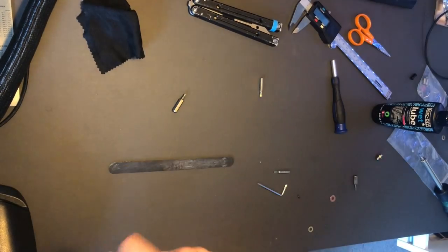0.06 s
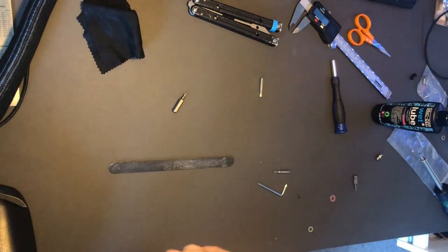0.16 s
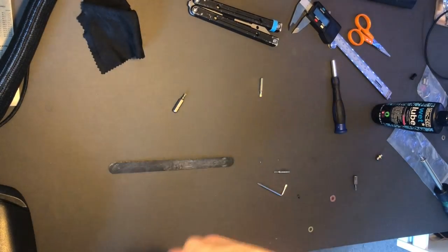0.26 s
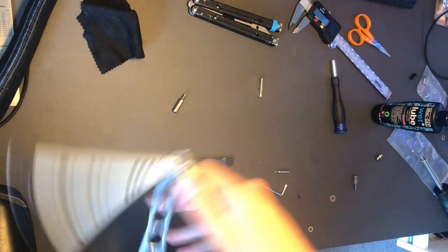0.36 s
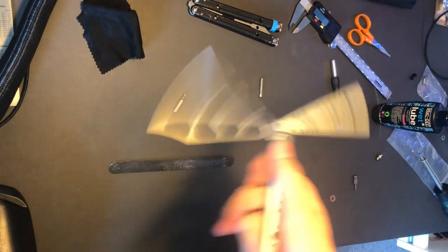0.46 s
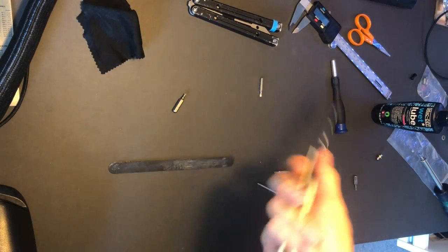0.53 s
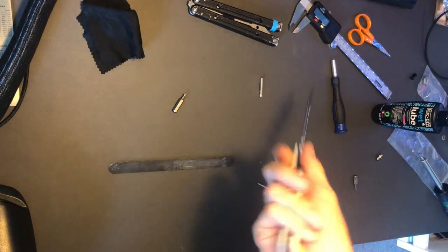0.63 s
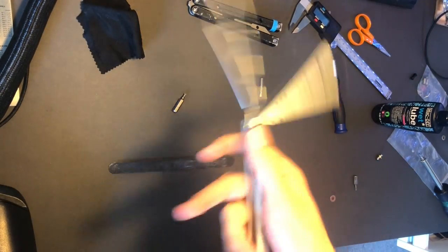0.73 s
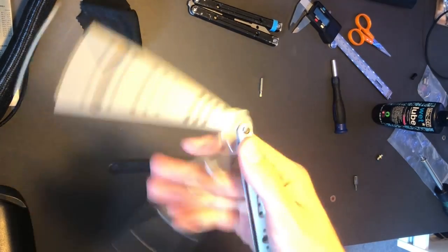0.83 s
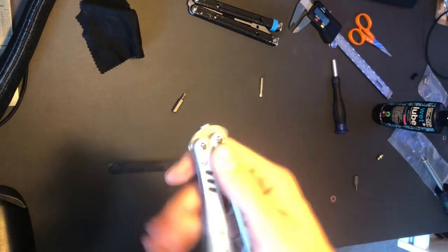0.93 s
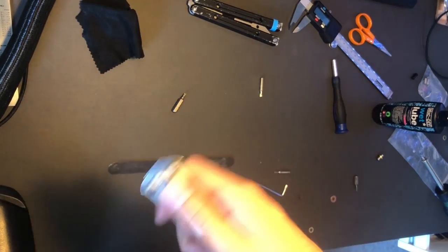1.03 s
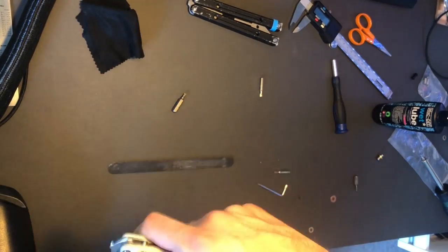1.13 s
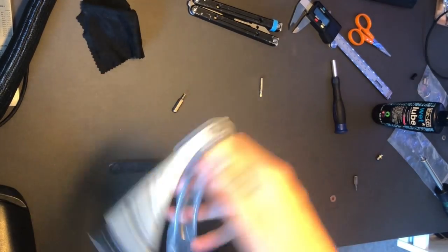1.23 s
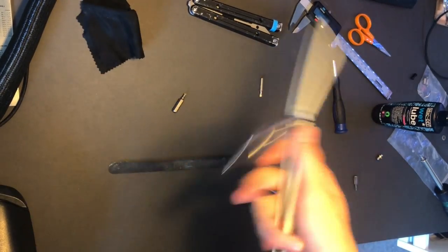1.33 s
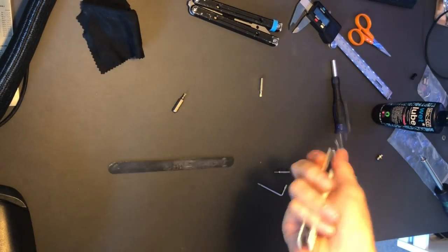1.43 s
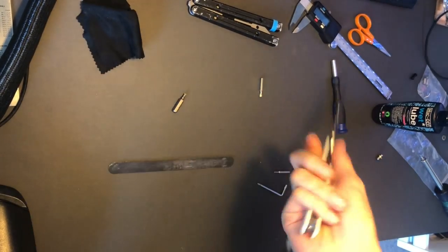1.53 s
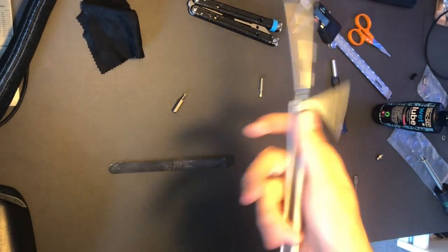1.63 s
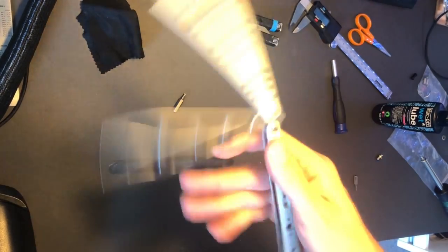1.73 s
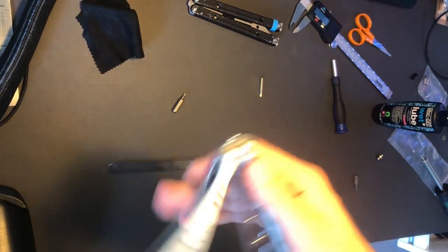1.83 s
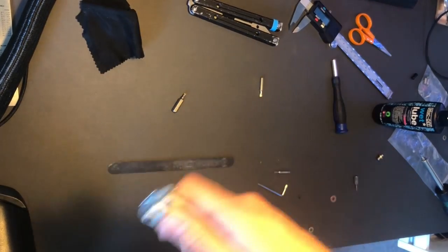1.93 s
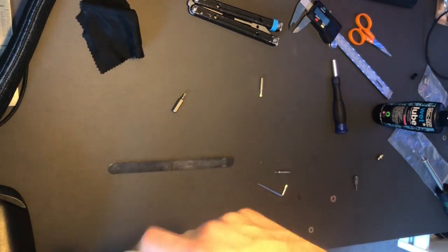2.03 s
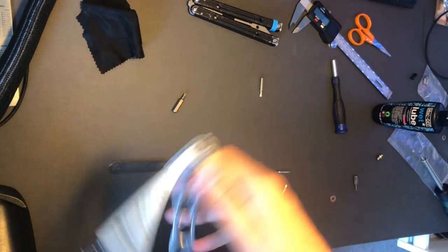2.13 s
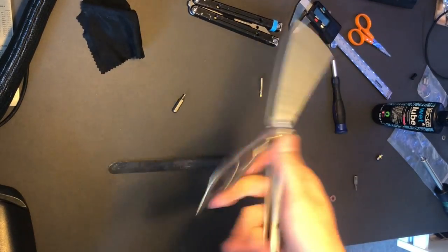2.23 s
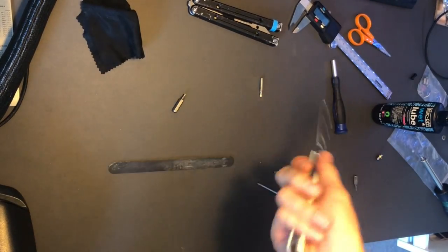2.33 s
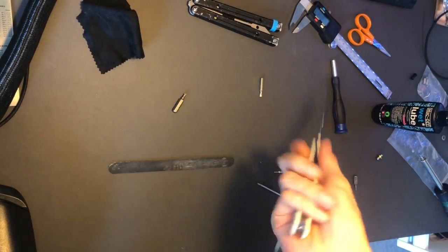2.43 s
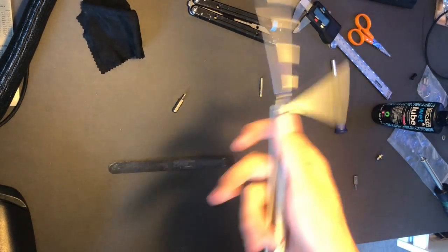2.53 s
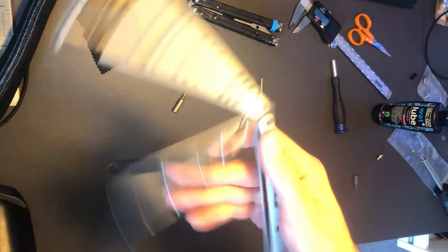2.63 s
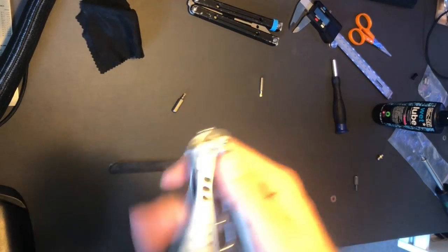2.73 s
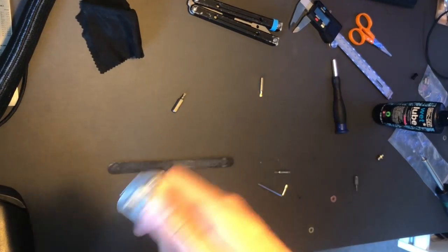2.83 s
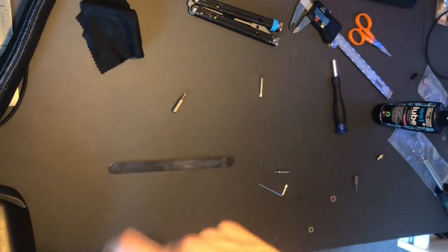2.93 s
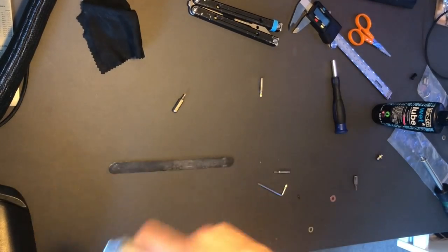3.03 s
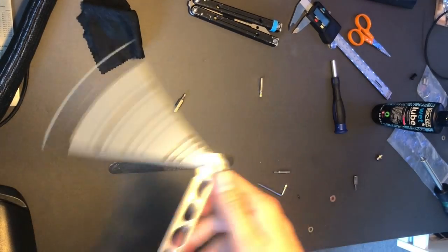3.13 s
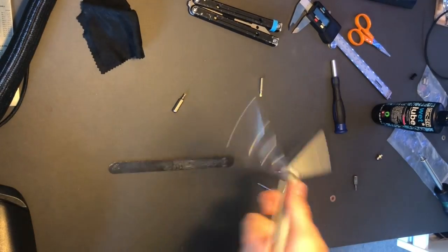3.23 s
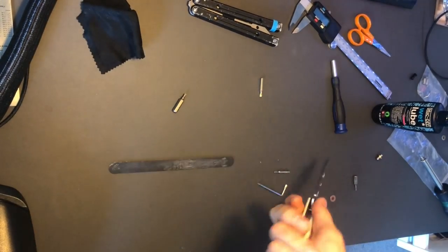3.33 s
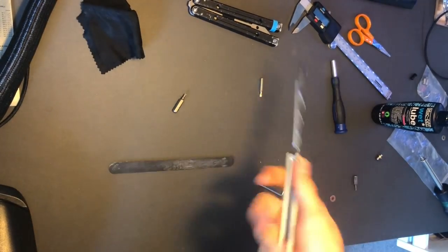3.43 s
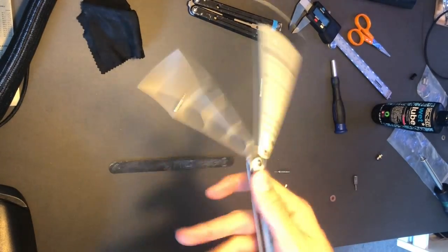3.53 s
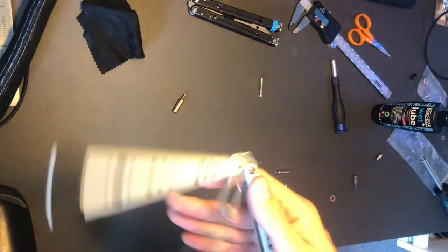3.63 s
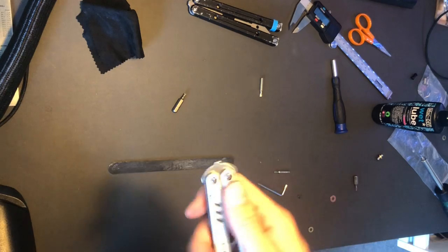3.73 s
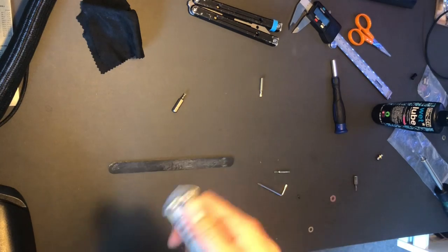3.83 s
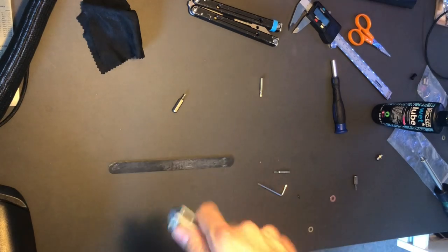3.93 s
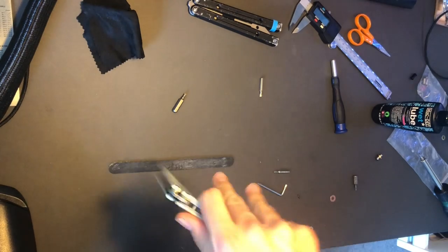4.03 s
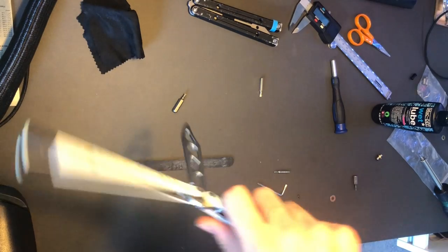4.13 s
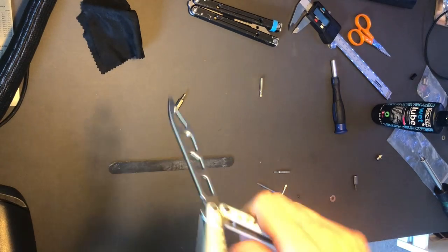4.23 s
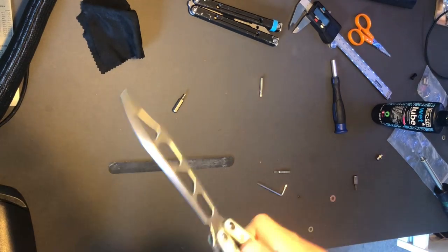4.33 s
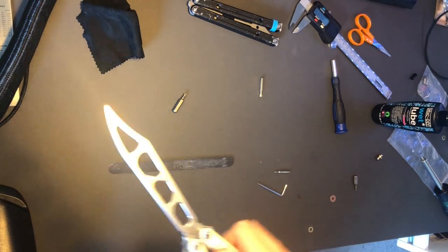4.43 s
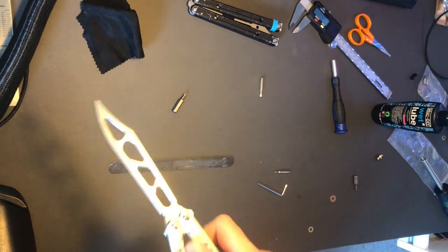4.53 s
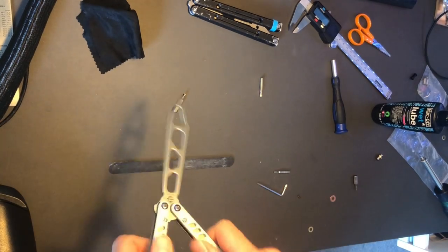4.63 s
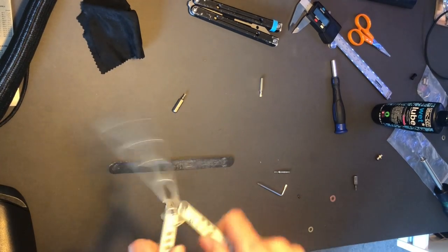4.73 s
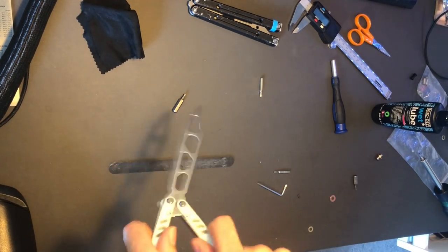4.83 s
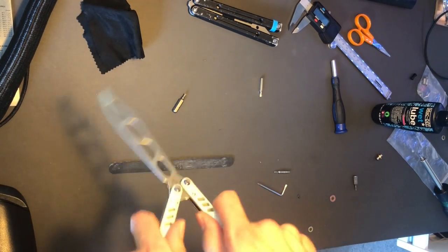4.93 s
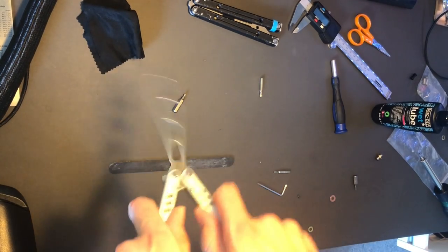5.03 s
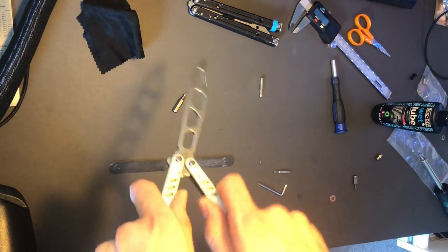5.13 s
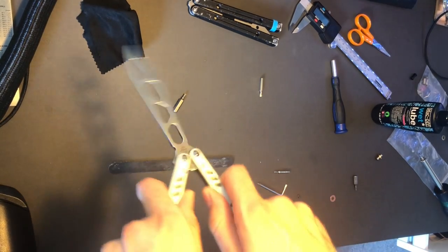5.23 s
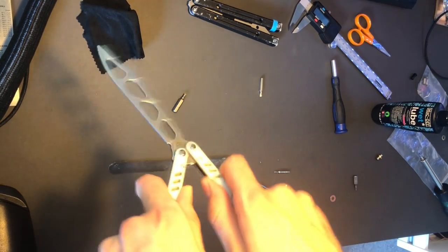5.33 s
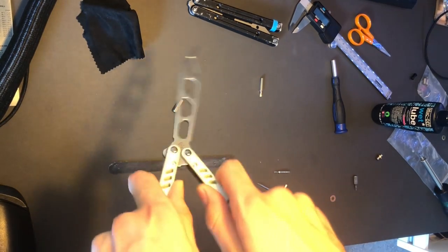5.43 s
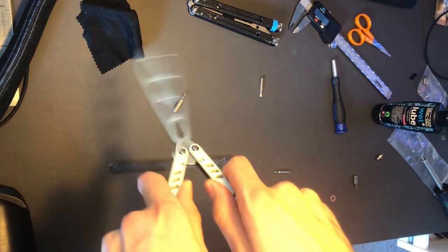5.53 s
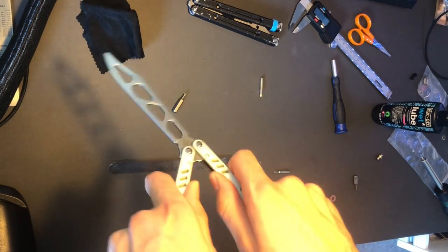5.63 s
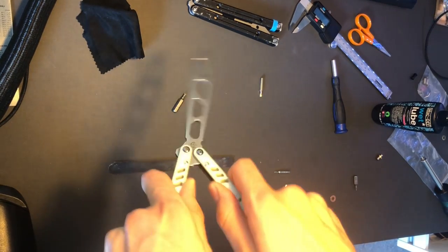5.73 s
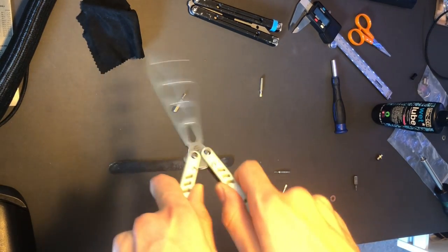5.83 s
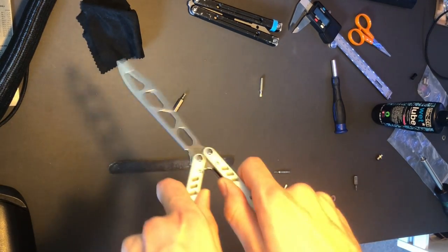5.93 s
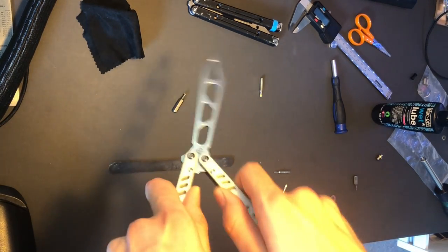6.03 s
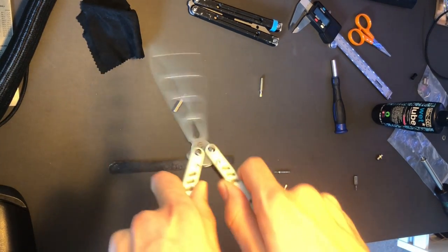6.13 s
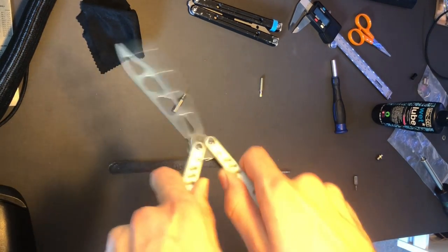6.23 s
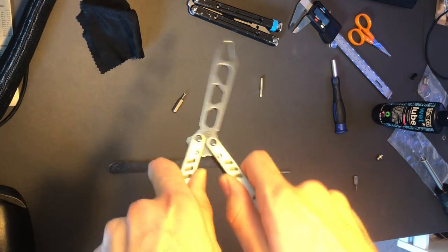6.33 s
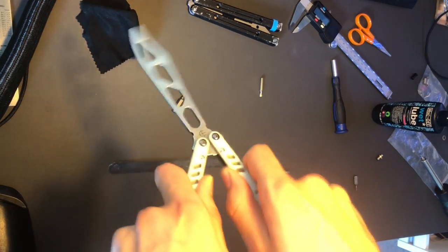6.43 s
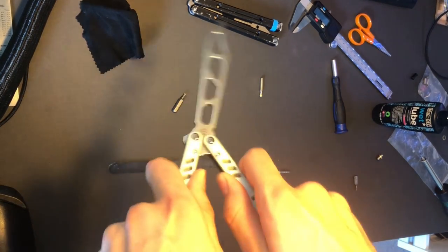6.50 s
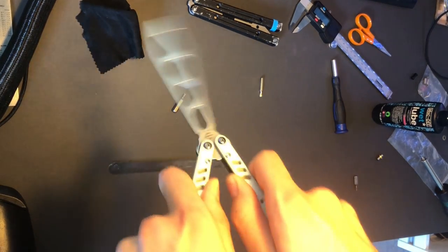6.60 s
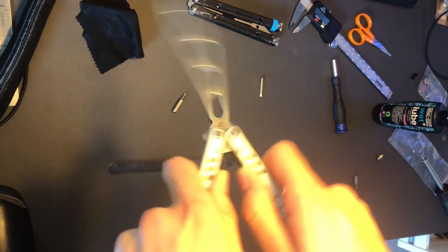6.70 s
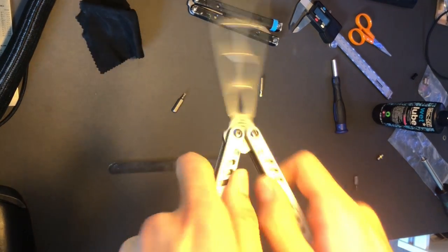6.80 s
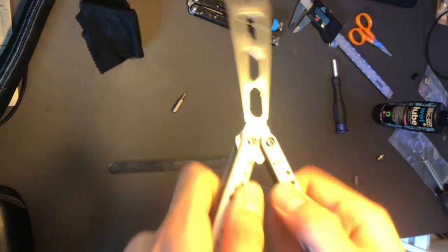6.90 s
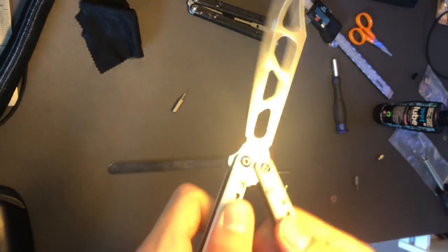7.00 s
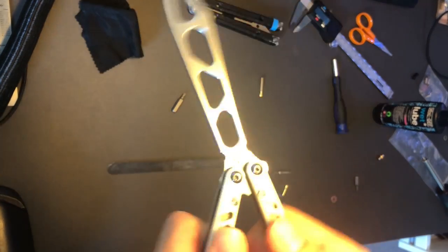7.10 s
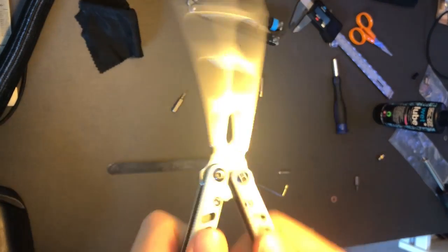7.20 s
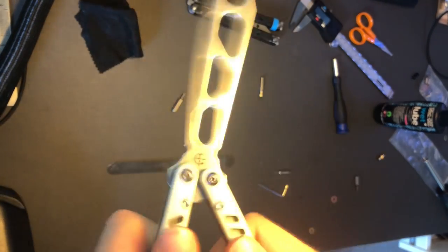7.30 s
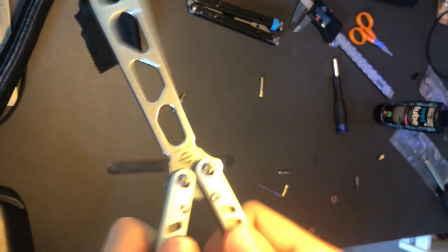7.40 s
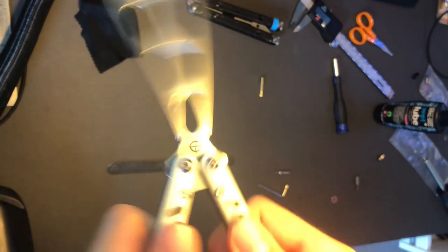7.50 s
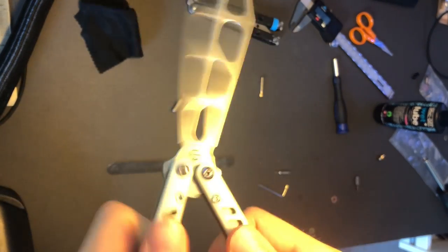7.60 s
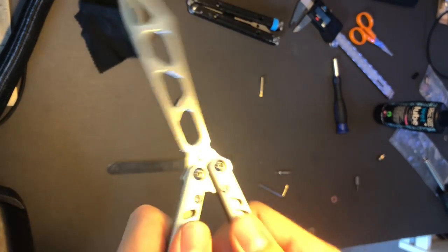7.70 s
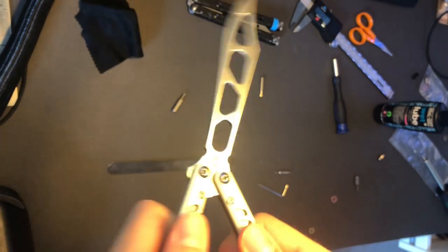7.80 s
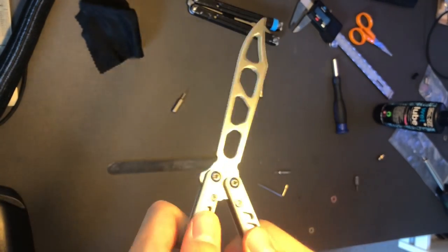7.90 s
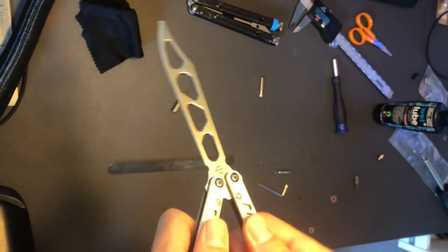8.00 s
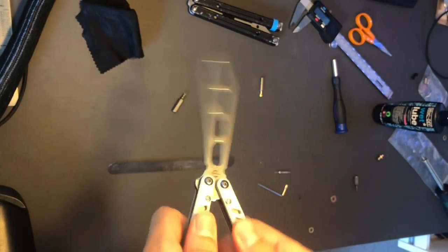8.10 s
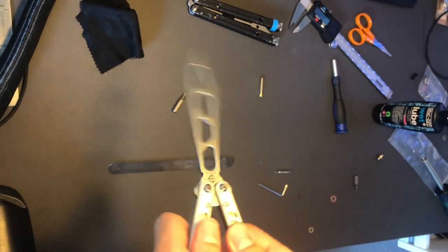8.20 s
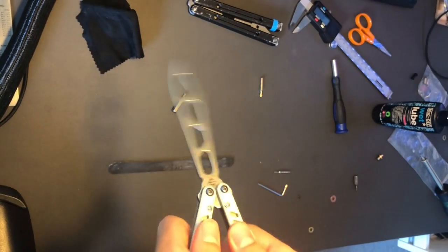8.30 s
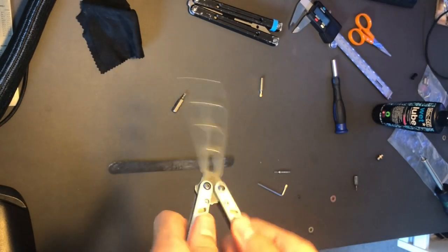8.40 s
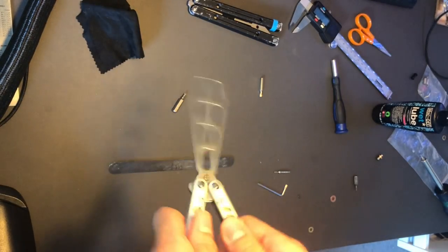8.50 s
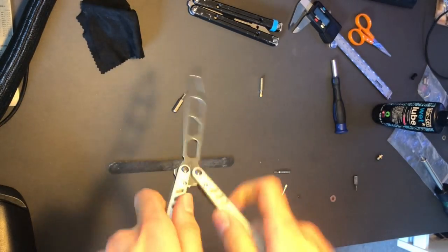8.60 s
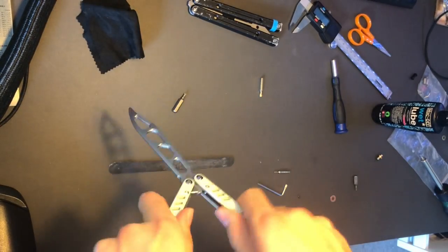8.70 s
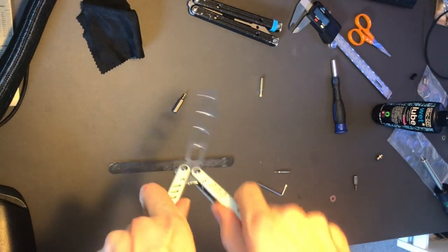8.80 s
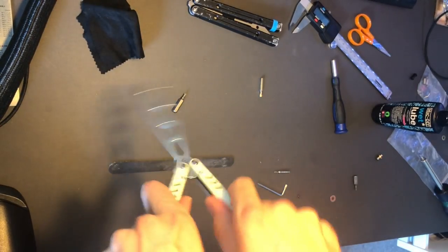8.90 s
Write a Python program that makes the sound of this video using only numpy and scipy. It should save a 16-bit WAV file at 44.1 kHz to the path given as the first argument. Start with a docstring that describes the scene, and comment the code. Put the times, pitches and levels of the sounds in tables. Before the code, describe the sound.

A steel butterfly knife is flipped open and shut with sharp clacks, then its blade is rocked in rapid, even metallic clicks.

```python
"""Impacts of a folding knife

A steel two-handled knife is flipped open and shut in a small quiet room, then held by both handles
while the blade is rocked fast between its stop pins. Each contact chatters briefly, excites the
steel's damped modes and reverberates. Skin and sleeve rub softly, and a fan hums throughout."""
import sys
import numpy as np
from scipy import signal
from scipy.fft import rfft, irfft
from scipy.io import wavfile
from scipy.ndimage import uniform_filter1d

SR = 44100
rng = np.random.default_rng(int(sys.argv[2]) if len(sys.argv) > 2 else 0)


def generate_wav(sig):
    """Save sig (samples, or channels by samples) to the path in sys.argv[1] as 16-bit PCM at SR."""
    pcm = np.round(np.clip(np.atleast_2d(sig).T, -1, 1) * 32767).astype(np.int16)
    wavfile.write(sys.argv[1], SR, pcm)


N = 394694
TIME_S, RING_TIME_S = np.arange(N) / SR, np.arange(4096) / SR


def gain_of(db):
    """Decibels to amplitude ratio."""
    return 10 ** (np.asarray(db) / 20)


def unit_rms(x):
    """Normalisation to unit power."""
    return x / np.sqrt(np.mean(x ** 2) + 1e-20)


def value_at(points, hz):
    """Interpolation on a log-frequency axis."""
    f, value = np.transpose(points)
    return np.interp(np.log(hz + 1), np.log(f + 1), value)


def add(mix, start_s, sound):
    """Superposition: a sound sums into the mix from start_s."""
    part = mix[round(start_s * SR):][:len(sound)]
    part += sound[:len(part)]


def minimum_phase(x, spectrum):
    """Causal filtering: the phase follows from the log gain by a Hilbert transform."""
    log_gain = np.log(gain_of(value_at(spectrum, abs(np.fft.fftfreq(1024, 1 / SR)))))
    taps = np.fft.ifft(np.exp(np.conj(signal.hilbert(log_gain)))).real[:512]
    return signal.oaconvolve(x, taps / np.linalg.norm(taps))[:N]


def drifting_noise(spectrum, drift_db):
    """Random modulation: coloured noise wavers in patches of time and frequency."""
    frames, hz = N // 512 + 5, np.fft.rfftfreq(2048, 1 / SR)
    real, imag, patches = rng.standard_normal((frames, 1025, 3)).T
    patches = unit_rms(uniform_filter1d(uniform_filter1d(patches, 16, 0), 6, 1))
    bins = (real + 1j * imag) * gain_of(value_at(spectrum, hz)[:, None] + drift_db * patches)
    return unit_rms(signal.istft(bins, nperseg=2048, noverlap=1536)[1][:N])


# Fan noise spectrum: frequency_hz, relative_db
FAN_SPECTRUM = [(24, -53.5), (40, -12.5), (86, -9.5), (197, -22.5), (214, -5), (299, -5.5), (353, -5),
                (428, -17), (641, -16.5), (811, -23.5), (1100, -41.5), (1430, -66.5), (2420, -120)]
# Hiss spectrum: frequency_hz, relative_db
HISS_SPECTRUM = [(600, -37), (1000, -4.5), (1400, -7.5), (2500, -14), (4000, -12.5), (5800, -9.5),
                 (7500, -15), (12600, -22), (16500, -38)]
# Swell of a distant rumble: time_s, level_db
RUMBLE_LEVELS = [(0, -81), (2.799, -71.5), (3.099, -65.5), (3.499, -65), (3.8, -71.5), (4.2, -69),
                 (9, -70.5)]

def background(hum_hz=226):
    """Broadband and narrowband noise: a fan with its hum, a hiss and a low rumble."""
    swell = gain_of(np.interp(TIME_S, *np.transpose(RUMBLE_LEVELS)))
    rumble = swell * drifting_noise([(90, -44), (150, -1), (210, -46.5)], drift_db=3.1)
    hum_band = [(hum_hz - 6, -40), (hum_hz, 0), (hum_hz + 6, -40)]
    hum = gain_of(-77.5) * drifting_noise(hum_band, drift_db=1.5)
    fan = gain_of(-62.5) * drifting_noise(FAN_SPECTRUM, drift_db=0.81)
    hiss = gain_of(-73.5) * drifting_noise(HISS_SPECTRUM, drift_db=1.4)
    return fan + hiss + rumble + hum


def mode(hz, t60_s, phase=0):
    """Damped oscillator: a sinusoid falls 60 dB in t60_s; phase is in cycles."""
    return gain_of(-60 * RING_TIME_S / t60_s) * np.sin(2 * np.pi * (hz * RING_TIME_S + phase))


# Modes of blade and handles: pitch_hz, level_db, t60_s
STEEL_MODES = [(2800, -14, .006), (3900, -9, .01), (4900, -5, .011), (5800, -2, .01), (6550, -2, .011),
               (7200, 0, .006), (8400, -4, .005), (9200, -8, .004), (10700, -6, .004), (12100, -7, .004),
               (14300, -8, .003)]

def steel_ring(level_db, tick_hz, focus_db, share, detune, phase):
    """Modal excitation: the spot struck sets each mode's share; light or focused blows reach fewer."""
    hz, db, t60_s = np.transpose(STEEL_MODES)[:, :, None]
    db_per_octave = 1 + 0.079 * max(level_db, -30) - focus_db
    db = db + db_per_octave * abs(np.log2(hz / tick_hz)) + 5 * (share[:, None] - .5)
    hz = hz * (1 + .03 * (detune[:, None] - .5))
    return (gain_of(db) * mode(hz, t60_s, phase[:, None])).sum(0)


# Knock into the hands as the grip changes: time_s, level_at_1khz_db, slope_db_per_octave
GRIP_KNOCK = [(0, -17.5, -1.5), (4.1, -22.5, -1), (4.9, -10.5, 6.5), (8.9, -10, 13.5)]

def handle_clack(start_s, clack_hz, share, detune, phase):
    """Free decay: a short clack and knock, then both handles ring faintly, slightly apart in pitch."""
    clack = mode(clack_hz * (1 + .12 * (detune[0] - .5)), t60_s=.016)
    for side in (-1, 1):
        handle_hz = clack_hz * (1 + side * .035 * share[side])
        clack += gain_of(-24) * mode(handle_hz, t60_s=.16, phase=phase[side])
    grip_s, *grip = np.transpose(GRIP_KNOCK)
    knock_db, slope_db = (np.interp(start_s, grip_s, column) for column in grip)
    hz = np.geomspace(330, 1550, len(phase))[:, None]
    weights = gain_of(knock_db + slope_db * np.log2(hz / 1000)) * np.sign(phase[:, None] - .5)
    knock = (weights * mode(hz, t60_s=12.66 / hz)).sum(0)
    return (clack + knock) * (1 - np.exp(-RING_TIME_S / .00047))


def impact(start_s, level_db, tick_hz, clack_db, chatter_ms, clack_hz, focus_db, room_db=0):
    """Convolution: a blow and its dying micro-bounces drive tick and steel, over the handles' clack."""
    bounce_at, bounce_size, *mode_draws = rng.random((5, len(STEEL_MODES)))
    chatter = np.zeros(512)
    delay_samples = np.minimum(bounce_at * chatter_ms * 1e-3 * SR, 511).astype(int)
    np.add.at(chatter, delay_samples, .55 * (2 * bounce_size - 1) * gain_of(-6 * bounce_at))
    chatter[0] += 1
    steel = gain_of(-6) * steel_ring(level_db, tick_hz, focus_db, *mode_draws)
    onset = 1 - np.exp(-RING_TIME_S / 1.2e-4)
    click = signal.fftconvolve(chatter, onset * (mode(tick_hz, t60_s=.004) + steel))[:len(onset)]
    # small parts radiate no bass
    click = signal.sosfilt(signal.butter(3, 1700, "high", fs=SR, output="sos"), click)
    click /= np.sqrt(uniform_filter1d(click ** 2, 40).max() * 2)  # envelope peaks at 1
    clack = gain_of(clack_db) * handle_clack(start_s, clack_hz, *mode_draws)
    return start_s, gain_of(level_db) * (click + clack), focus_db, room_db


# Flips open: start_s, level_db, pitch_hz
OPENINGS = [(0.5617, -9.5, 5720), (1.4745, -7, 6200), (2.3767, -5.5, 5600), (3.337, -7.5, 5860)]
# Contacts in each flip: offset_ms, relative_db, pitch_ratio, clack_db, chatter_ms
OPENING_BOUNCES = [(-26, -48.5, 1.01, -22, 1.1), (0, 1.5, 1, -16, 1.5), (21, -8.5, 0.85, -12.5, 1.4),
                   (31, -20.5, 3, -17.5, 2.1), (38.5, -29, 2.9, -12, 3.3)]

def flips_open():
    """Inelastic collision: handle grazes handle, lands, then bounces ever more weakly."""
    return [impact(s + ms / 1000, db + relative_db, hz * ratio, clack_db, chatter_ms,
                   clack_hz=1890, focus_db=2.5)
            for s, db, hz in OPENINGS for ms, relative_db, ratio, clack_db, chatter_ms in OPENING_BOUNCES]


# Reverberation time: frequency_hz, t60_s
ROOM_DECAY = [(500, 0.39), (1320, 0.22), (3480, 0.23), (9190, 0.16), (15000, 0.15)]
# Room level, lower when the knife is near the microphone: time_s, level_db
ROOM_LEVELS = [(0, -11.5), (4.2, -12), (4.9, -11), (6.8, -10.5), (7.05, -15), (8.9, -11)]

def reverberation(x):
    """Diffuse field: each band decays at its own rate; the reflections drift as the knife moves."""
    x = x * gain_of(np.interp(TIME_S, *np.transpose(ROOM_LEVELS)))
    reflections, patterns, patterns_per_s = np.zeros(N), 8, 11
    for k in range(patterns):
        hz, t, bins = signal.stft(rng.standard_normal(SR // 2), SR, nperseg=128)
        decay = gain_of(-60 * t / value_at(ROOM_DECAY, hz)[:, None])
        tail = signal.istft(bins * decay, SR, nperseg=128)[1]
        tail *= np.clip(np.arange(len(tail)) / SR / .0004, 0, 1)  # reflections build up
        offset = (TIME_S * patterns_per_s - k) % patterns - patterns / 2
        crossfade = np.cos(np.pi / 2 * np.clip(offset, -1, 1))
        reflections += signal.oaconvolve(x * crossfade, tail / np.linalg.norm(tail))[:N]
    return reflections


# Flips shut: start_s, level_db, pitch_hz
CLOSINGS = [(0.905, -11.5, 7750), (1.8506, -11, 7700), (2.7264, -11, 7470), (3.7049, -14, 7290)]
# Graze and hit on the pin: offset_ms, relative_db, pitch_ratio, clack_db, chatter_ms
CLOSING_BOUNCES = [(-21.5, -54.5, 0.89, -22.5, 2.1), (0, 3, 0.99, -20, 2.5)]

def flips_shut():
    """Directivity: the blade clicks on its stop pin, radiating more to the microphone than the walls."""
    return [impact(s + ms / 1000, db + relative_db, hz * ratio, clack_db, chatter_ms,
                   clack_hz=1675, focus_db=2.5, room_db=-3.5)
            for s, db, hz in CLOSINGS for ms, relative_db, ratio, clack_db, chatter_ms in CLOSING_BOUNCES]


# The handles slam shut and rattle: start_s, level_db
RATTLE_HITS = [(0.959, -4), (0.9669, -12), (0.9722, -15), (0.9778, -8.5), (0.9836, -24.5), (0.994, -15.5),
               (1.0087, -19), (1.0143, -14.5), (1.03, -11), (1.8998, -13), (1.9063, -7), (1.913, -11),
               (1.921, -15.5), (1.9464, -26), (1.955, -17), (1.9606, -25), (1.9716, -20), (2.7776, -5),
               (2.7832, -3.5), (2.79, -35), (2.797, -12), (2.8066, -13), (2.8136, -17.5), (2.8175, -10),
               (2.8329, -8), (2.8375, -11), (3.7542, -5.5), (3.7591, -7), (3.7635, -10), (3.77, -8.5),
               (3.7875, -15), (3.8016, -12.5), (3.81, -20.5)]

def handle_rattle():
    """Repeated impact: the handles rattle and grind on varying spots; softer contacts scrape longer."""
    grinds = [(s + rng.uniform(.083, .12), -18 - 8 * rng.random())
              for s, _, _ in CLOSINGS for _ in range(9)]
    return [impact(s, db, tick_hz=6600 * (1 + .16 * (rng.random() - .5)), clack_db=-26,
                   chatter_ms=.78 - .4 * db, clack_hz=2440, focus_db=6) for s, db in RATTLE_HITS + grinds]


def palm_thuds():
    """Soft impact: the shut knife lands in the palm and excites one low mode."""
    thuds = np.zeros(N)
    for s, _, _ in CLOSINGS:
        add(thuds, s + .055, gain_of(-44) * mode(hz=390, t60_s=.1))
    return thuds


# Hand movements: start_s, hold_s, level_db
RUB_STROKES = [(3.023, 0.099, -62), (4.475, 0.0094, -72), (4.563, 0.0092, -63), (4.647, 0.11, -70)]
# Friction spectrum: frequency_hz, relative_db
RUB_SPECTRUM = [(880, -48.5), (1500, -13), (4200, -4.5), (11800, -19), (16000, -28)]

def hand_rub():
    """Friction noise: skin and sleeve crackle in strokes that rise, hold and fade to a faint rustle."""
    level_db, rise_db_per_s, fall_db_per_s = np.full(N, -83.), 650, 250
    for s, hold_s, db in RUB_STROKES:
        drop_db = np.maximum(rise_db_per_s * (s - TIME_S), fall_db_per_s * (TIME_S - s - hold_s))
        level_db = np.maximum(level_db, db - np.maximum(drop_db, 0))
    noise = rng.standard_normal(N)
    in_grain = uniform_filter1d(1. * (rng.random(N) < 150 / SR), 60) > 0  # about 150 grains a second
    colour = gain_of(value_at(RUB_SPECTRUM, np.fft.rfftfreq(N, 1 / SR)))
    crackle = irfft(rfft(noise * (1 + .71 * in_grain)) * colour, N)
    return gain_of(level_db) * unit_rms(crackle)


# Taps as the grip changes: start_s, level_db, pitch_hz
GRIP_TAPS = [(3.027, -53, 6500), (3.0505, -42.5, 5750), (3.0823, -48, 4570), (3.127, -53, 3200),
             (4.3028, -20.5, 7070), (4.33, -24, 6600), (4.3396, -28.5, 7060), (4.344, -36, 6650),
             (4.5393, -28, 6950), (8.3211, -22, 8440)]

def grip_taps():
    """Weak excitation: the parts touch lightly, with little chatter."""
    return [impact(*tap, clack_db=-12, chatter_ms=.7, clack_hz=1990, focus_db=1.5) for tap in GRIP_TAPS]


# The rocked blade hits a stop pin: start_s, level_db, pitch_hz, rebound_delay_ms, rebound_level_db
ROCKING_HITS = [(4.6637, -12, 6960, 4, -65), (4.7851, -9.5, 8000, 7.8, -31), (4.8622, -8.5, 5900, 6, -13.5),
                (4.943, -8, 5740, 10.3, -18.5), (5.0214, -9.5, 6900, 7.5, -16),
                (5.0953, -13.5, 5300, 11.8, -14.5), (5.156, -11.5, 7800, 7.2, -18.5),
                (5.2235, -9, 7550, 9.5, -13.5), (5.3123, -11.5, 6150, 3.7, -26),
                (5.3688, -9, 7100, 8.1, -20), (5.45, -10.5, 5850, 10, -17), (5.523, -11, 5800, 9.5, -19),
                (5.5952, -9.5, 5830, 7.7, -18.5), (5.6656, -9.5, 6600, 10.1, -15.5),
                (5.7435, -9.5, 7200, 9.4, -18), (5.8129, -9, 5640, 8.9, -18), (5.8958, -12, 6700, 8.7, -20),
                (5.9568, -9, 5680, 9.8, -18), (6.0455, -8.5, 7400, 7, -16.5), (6.1203, -9, 5140, 7.5, -18),
                (6.1922, -8.5, 7400, 8.2, -16), (6.2751, -6.5, 5680, 9.7, -25.5),
                (6.355, -9, 7730, 7.5, -15), (6.431, -8, 5100, 8, -16), (6.5166, -9.5, 7800, 7.3, -16.5),
                (6.591, -11.5, 7840, 6.5, -21), (6.6662, -6.5, 7700, 6.2, -17),
                (6.7565, -11.5, 4020, 7.2, -19.5), (6.856, -10, 6030, 9, -15),
                (7.0434, -12.5, 5900, 7, -40), (7.1008, -5, 6550, 7, -16.5),
                (7.183, -9.5, 5470, 10.6, -12.5), (7.2607, -6, 4510, 6, -13),
                (7.3379, -6.5, 7740, 7.4, -17.5), (7.4028, -5, 4370, 5, -18.5),
                (7.4917, -7, 6770, 8.5, -54), (7.5518, -7, 4500, 6.1, -15), (7.6426, -8, 6600, 7.7, -17),
                (7.7158, -7.5, 6200, 7.4, -19.5), (7.7827, -8, 6660, 7.9, -16.5),
                (7.9258, -10.5, 5500, 5.1, -15), (8.014, -7.5, 6000, 5.1, -14),
                (8.0911, -8, 7800, 7.5, -15), (8.1664, -9.5, 7570, 5.6, -16.5), (8.37, -9, 7500, 6.7, -18),
                (8.457, -6, 6020, 6.2, -50.5), (8.5429, -9.5, 7100, 8.3, -20.5),
                (8.813, -7.5, 6540, 9.2, -23), (8.8844, -10, 7850, 7.9, -13.5)]
# Looseness of the hold: time_s, chatter_ms, clack_hz
ROCKING_HOLD = [(4.701, 1.44, 2070), (5.5, 3.6, 2087), (6.201, 2.47, 2075), (6.701, 2.48, 2090),
                (6.9, 1.3, 2150), (7.3, 1.3, 2220), (8.1, 1.22, 2194), (8.9, 1.64, 2100)]

def blade_rocking():
    """Restitution: each hit rebounds twice, the second hop shorter and weaker; rebounds chatter longer."""
    hold_s, *hold = np.transpose(ROCKING_HOLD)
    blows = []
    for s, db, hz, delay_ms, rebound_db in ROCKING_HITS:
        chatter_ms, clack_hz = (np.interp(s, hold_s, column) for column in hold)
        delay_s = delay_ms / 1000
        rebound = dict(clack_db=-15, chatter_ms=1.4 * chatter_ms, clack_hz=clack_hz, focus_db=1.5)
        blows += [impact(s, db, hz, clack_db=-17.5, chatter_ms=chatter_ms, clack_hz=clack_hz, focus_db=1.5),
                  impact(s + delay_s, rebound_db, tick_hz=7270, **rebound),
                  impact(s + 1.65 * delay_s, rebound_db - 9, tick_hz=7600, **rebound)]
    return blows


# Colour of the knife at the microphone: frequency_hz, relative_db
DIRECT_SPECTRUM = [(1000, 1), (3000, 6), (4400, 2), (7000, 1.5), (9700, 7), (15500, 9), (16800, -13)]
# A blow averaged over all directions: frequency_hz, relative_db
WASH_SPECTRUM = [(300, -28), (1600, -16), (2100, -7.5), (3100, -13), (3900, -11.5), (4350, -8.5),
                 (4900, -7), (7200, -1.5), (9600, -8.5), (16500, -20)]

def radiation(blows):
    """Direct and wall-bound sound: the walls also get a broadband wash, weaker for focused blows."""
    direct, outward, wash = palm_thuds(), np.zeros(N), np.zeros(N)
    for start_s, sound, focus_db, room_db in blows:
        add(direct, start_s, sound)
        add(outward, start_s, gain_of(room_db) * sound)
        add(wash, start_s, [gain_of(room_db - .6 * focus_db) * np.linalg.norm(sound)])
    to_walls = gain_of(-1) * minimum_phase(outward, DIRECT_SPECTRUM)
    to_walls += gain_of(1.18) * minimum_phase(wash, WASH_SPECTRUM)
    return minimum_phase(direct, DIRECT_SPECTRUM), to_walls


def scene():
    """Superposition of the knife, its reverberation, rubbing and background noise, in mono."""
    blows = flips_open() + flips_shut() + handle_rattle() + grip_taps() + blade_rocking()
    direct, to_walls = radiation(blows)
    return (direct + reverberation(to_walls) + hand_rub() + background())[None]


def record(dry):
    """Soft saturation rounds the hardest blows; a bass cut and a low-pass then limit the band."""
    ceiling, bass_cut_hz, top_hz = .68, 42, 16800
    soft = dry / (1 + abs(dry / ceiling) ** 4) ** .25
    soft = signal.sosfilt(signal.butter(3, bass_cut_hz, "high", fs=SR, output="sos"), soft)
    low_pass = signal.firwin(255, top_hz, window=("kaiser", 9), fs=SR)
    return signal.oaconvolve(soft, low_pass[None], "same")


dry = scene()
out = record(dry)
generate_wav(out)
```